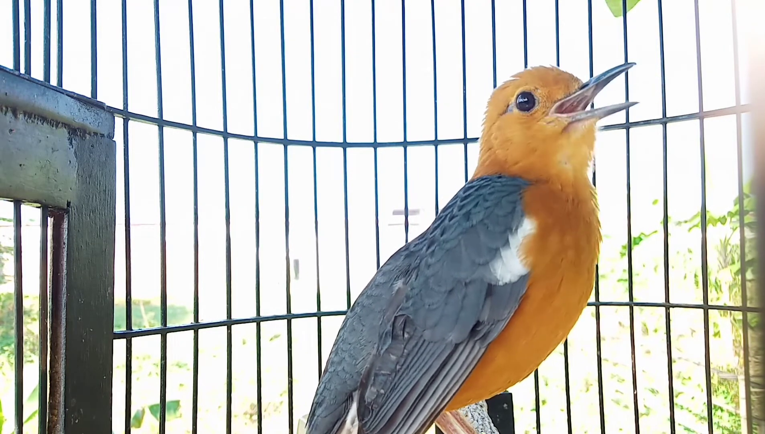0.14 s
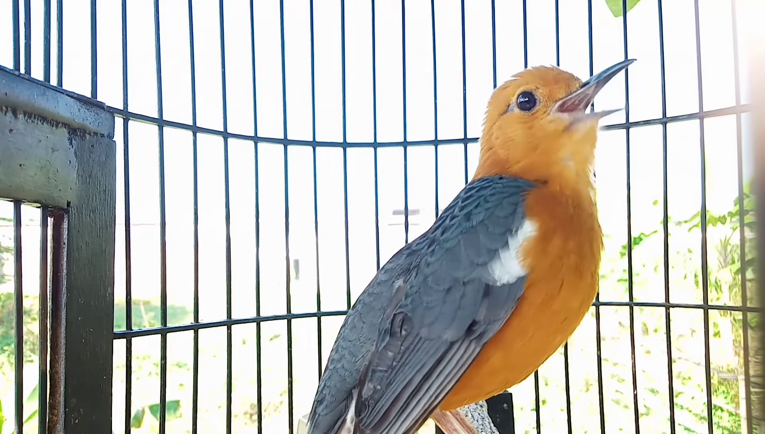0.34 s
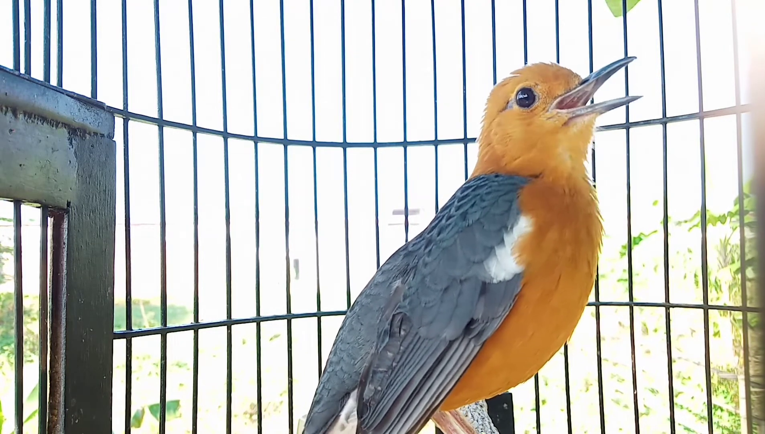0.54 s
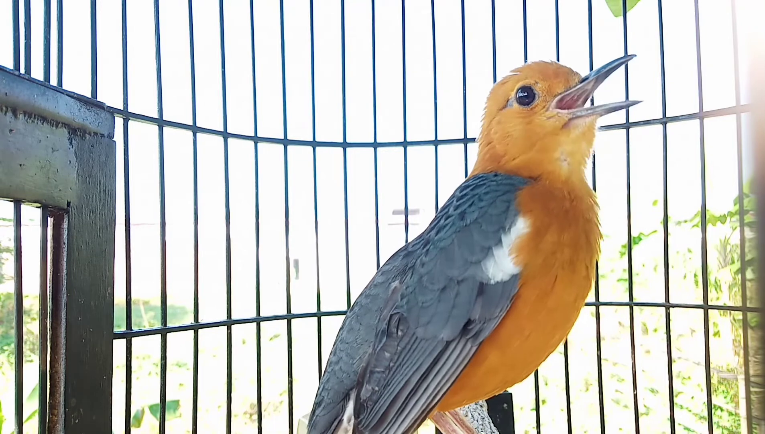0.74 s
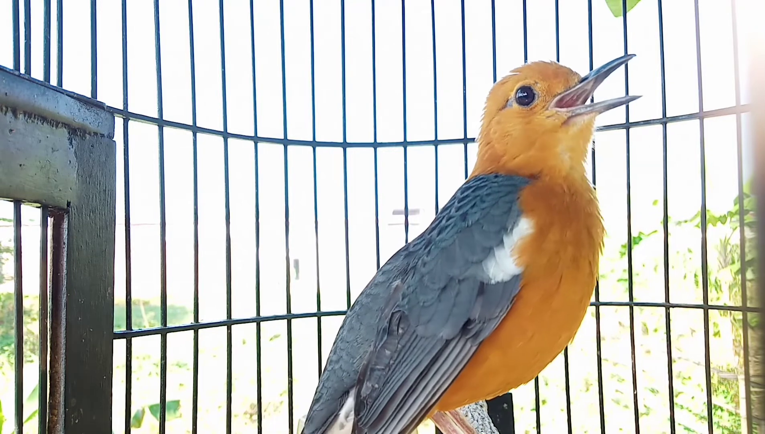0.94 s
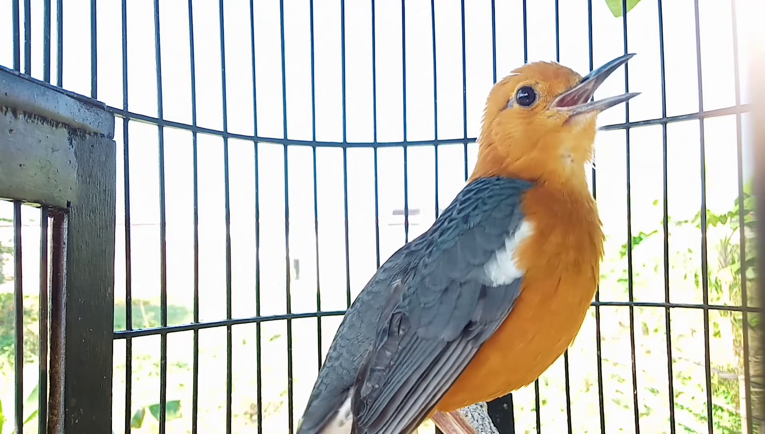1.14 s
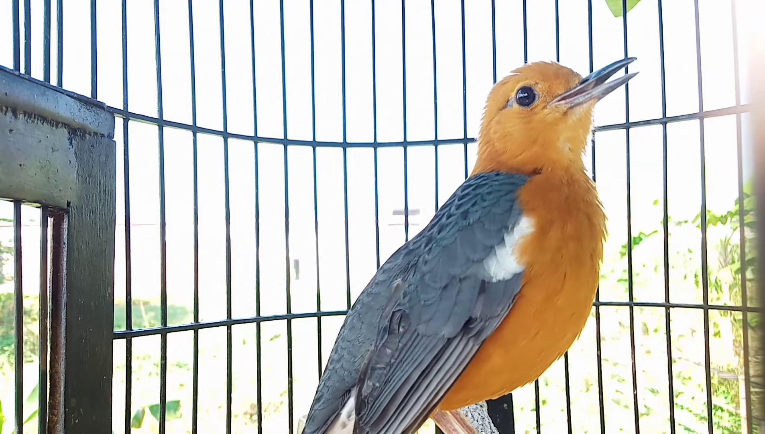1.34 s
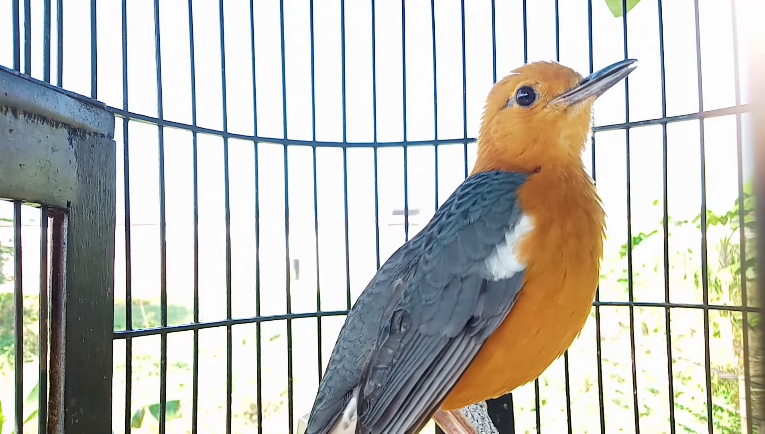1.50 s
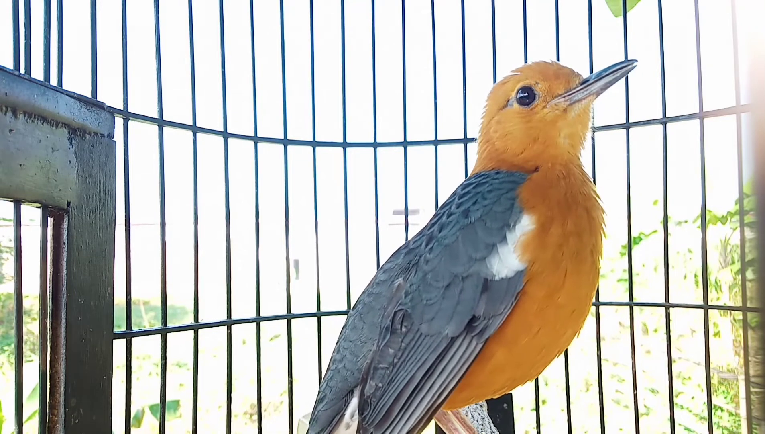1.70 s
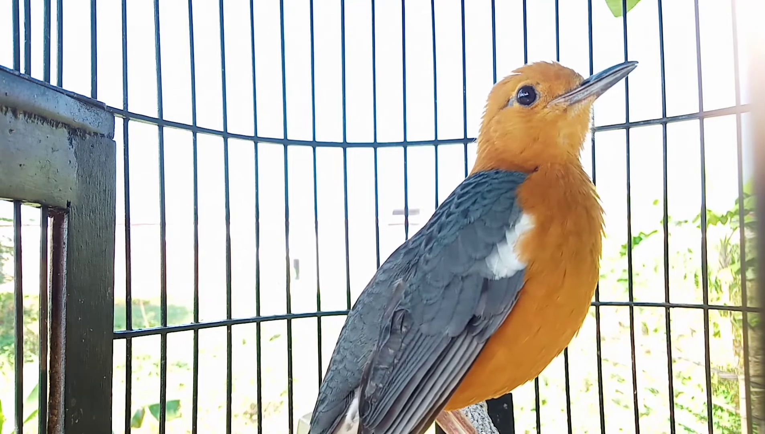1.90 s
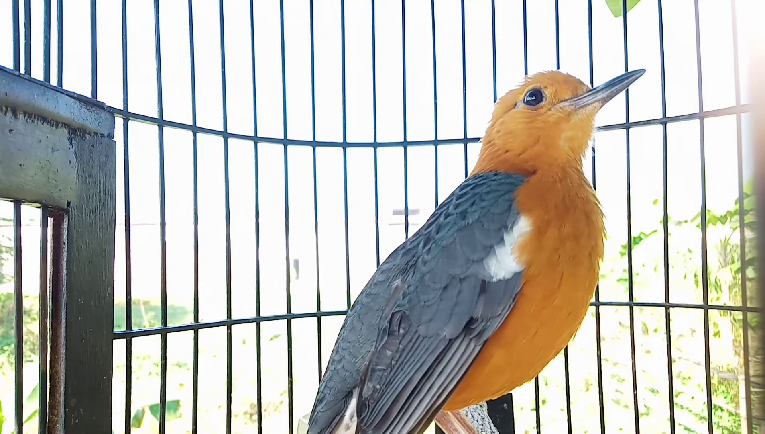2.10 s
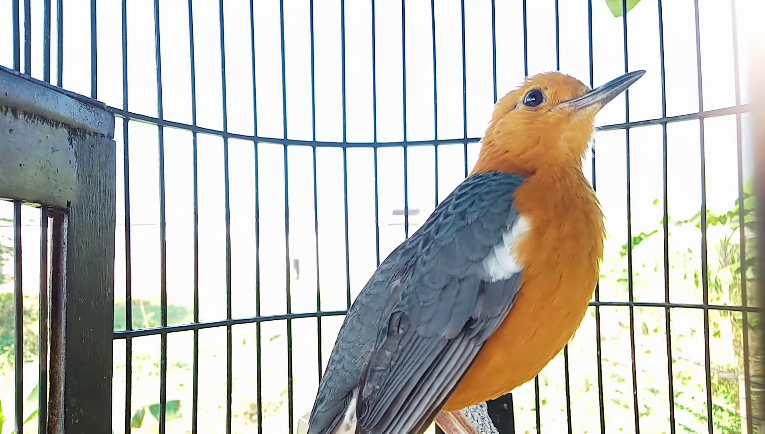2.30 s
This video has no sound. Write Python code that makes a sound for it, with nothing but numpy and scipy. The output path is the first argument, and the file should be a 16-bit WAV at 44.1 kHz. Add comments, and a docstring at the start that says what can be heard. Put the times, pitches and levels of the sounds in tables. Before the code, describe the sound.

A caged thrush whistles five loud slurred notes close by, slightly raspy and faintly echoing. The first rises at 0.1 seconds, the second dips and climbs, a softer low one follows at 0.6, and two falling notes end by 1.2. Faint dry insect-like ticks start behind the song and continue, slowing, until about 2.3 seconds. A soft low rumble lies under the quiet garden throughout.

```python
"""A quiet garden over a low outdoor rumble, the microphone close to a caged thrush. After one tiny
tap the bird whistles five loud slurred notes, rasping in places as its syrinx flutters and air rushes;
the cage bars scatter the treble and walls throw back faint echoes. Soft dry ticks, perhaps an insect,
start behind the song, carry on after it and slow down. Near the end come two more taps and a far hum."""
import sys
import numpy as np
from scipy import signal
from scipy.fft import rfft, irfft
from scipy.io import wavfile

SR = 44100
rng = np.random.default_rng(int(sys.argv[2]) if len(sys.argv) > 2 else 0)


def transcribe(u):
    """Save the signal u as a 16-bit wav file named by the first command-line argument.

    u: samples, shape (n,) or (channels, n), limited to [-1, 1]; the rate is SR.
    q: integer samples, one column per channel.
    """
    v = np.clip(np.atleast_2d(u).T, -1, 1)
    q = np.round(v * 32767).astype(np.int16)
    wavfile.write(sys.argv[1], SR, q)


N = 103635
TIME = np.arange(N) / SR


def thrush():
    """Close to the microphone: the syrinx whistles a gliding near-sine with weak, fuzzy overtones."""
    # The path of each note: t/s, f/Hz, level/dB, overtone gain/dB
    rise = [(0.112, 2040, -43, -13.5), (0.1215, 2346, -23, -13), (0.1454, 2395, -19, -20),
            (0.1514, 2490, -20, -18.5), (0.1679, 2690, -11.8, -20.5), (0.1813, 2675, -14.5, -15.5),
            (0.2113, 2850, -12.5, -13.5), (0.2143, 2894, -12.5, -19), (0.2442, 2985, -14, -7),
            (0.2487, 2941, -13.5, -12.5), (0.2786, 3076, -16.5, -7.5), (0.2846, 3570, -21.5, -29),
            (0.2886, 3220, -33.5, -21)]
    scoop = [(0.3465, 3705, -36, -12), (0.35, 3677, -13, -29), (0.3634, 3674, -5.5, -29),
             (0.3694, 3495, -11.5, -31.5), (0.3769, 3110, -11.5, -18.5), (0.3814, 3227, -11.5, -26.5),
             (0.4009, 2490, -16.5, -19), (0.4233, 2680, -11.5, -29.5), (0.4263, 2462, -17.5, -28),
             (0.4443, 2371, -18.5, -19.5), (0.4727, 2466, -17.5, -26.5), (0.4892, 2640, -12.0, -30.5),
             (0.4922, 2840, -15.5, -22.5), (0.5086, 2975, -12.5, -31), (0.5191, 2925, -10, -28.5),
             (0.5236, 3064, -15, -29), (0.5366, 2655, -44, -27.5)]
    low_note = [(.6165, 1490, -51.5, -2.5), (0.623, 1660, -44, -8.5), (0.6215, 1897, -29, -12.5),
                (0.631, 2058, -25.5, -21.5), (0.644, 2157, -20.5, -23), (0.656, 2089, -21, -28.5),
                (.675, 2054, -23.5, -24), (.689, 2228, -15, -32.5), (.712, 2073, -21, -26),
                (0.7145, 1966, -28.5, -16), (.718, 1910, -23, -19.5), (.729, 1680, -50, -13.5)]
    fall = [(.7717, 3646, -37.5, -34), (.776, 3597, -14.5, -26), (.786, 3498, -11, -40),
            (.793, 3390, -7.5, -23), (.805, 3015, -13.5, -29), (.809, 2930, -8.5, -40),
            (.818, 2880, -7, -30.5), (.823, 2792, -12.5, -22.5), (.843, 2727, -11.5, -23.5),
            (.849, 2594, -12, -23.5), (.86, 2553, -14, -25.5), (.9265, 2443, -21, -25),
            (.932, 2326, -30, -15.5), (.936, 2340, -50, -19)]
    last_fall = [(1.012, 3936, -25.5, -17), (1.017, 3590, -9, -39.5), (1.0234, 3566, -10, -28.5),
                 (1.0558, 3230, -8, -23.5), (1.0614, 3020, -11.5, -21.5), (1.0733, 3023, -10.0, -28),
                 (1.0921, 2752, -13, -19.5), (1.1048, 2770, -10, -28), (1.1147, 3010, -14, -29),
                 (1.1179, 2965, -12, -28.5), (1.1392, 2896, -13, -29.5), (1.1577, 2807, -15.5, -36),
                 (1.1709, 2637, -12, -30.5), (1.182, 2260, -45.5, -16)]
    # Overtone mix, a row per note: gain/dB of harmonics 2 to 7
    overtones = [(-1.5, -5, -11, -16, -20.5, -3), (-8.5, -6, -18.5, -13.5, -12, -2.5),
                 (-8.5, -6, -17.5, -9, -11.5, -4), (-2, -2, -11, -14, -16, -15.5),
                 (-3, -3.5, -11, -18, -21.5, -18.5)]
    # Colour that throat and beak give the overtones: f/Hz, gain/dB
    throat = [(2900, 29), (3700, 16.5), (4300, 0), (5700, -5.5), (6500, -8.5), (7400, 2), (8600, 3),
              (9800, -0.5), (11500, -6), (13000, -6), (14700, 1.5), (15700, -6)]
    notes = [rise, scoop, low_note, fall, last_fall]
    # Per note: harmonics 5 to 7 fade as the pitch climbs past middle_hz (negative: they grow)
    fades_db_per_khz, middle_hz = [-1.5, 20, 0, 28.5, 13], 2537
    steady_jitter, flutter_swing = 0.0017, 0.14  # shares of the pitch
    shimmer_db, waver_db, fuzz_rad = 1, 1.5, 0.1

    flutter, jitter, rush, fizz = rasp()
    bend = 1 + (steady_jitter + jitter) * band(0, 250) + flutter_swing * flutter
    tremble = (1 + flutter) * amp(shimmer_db * band(0, 110))
    air = breath(rush, fizz)
    wavers = [(waver_db * band(0, 70), fuzz_rad * band(0, 400.5)) for _ in overtones[0]]
    song = np.zeros(N)
    for note, mix, fade_db_per_khz in zip(notes, overtones, fades_db_per_khz):
        times, *columns = np.transpose(note)
        on = gate(times[0], times[-1], edge_s=0.00195)
        at = on > 0
        hz, level_db, bright_db = (glide(times, column)[at] for column in columns)
        phase = 2 * np.pi * np.cumsum(hz * bend[at]) / SR
        fade_db = fade_db_per_khz * np.maximum(hz - middle_hz, 0) / 1000
        tone = np.sin(phase)
        for k, (mix_db, (waver, fuzz)) in enumerate(zip(mix, wavers), 2):
            gain = amp(bright_db + mix_db + read(throat, k * hz) + waver[at] - (k >= 5) * fade_db)
            tone += (k * hz < SR / 2) * gain * np.sin(k * phase + fuzz[at])
        song[at] += on[at] * amp(level_db) * tremble[at] * (np.sqrt(2) * tone + air[at])
    return song


def glide(times, values, turn_s=0.0012):
    """A curve through the points with rounded corners: the syrinx cannot turn at once."""
    bell = np.exp(-.5 * (2 * np.arange(-200, 201) / SR / turn_s) ** 2)
    return signal.fftconvolve(np.interp(TIME, times, values), bell / bell.sum(), "same")


def rasp():
    """Flutter of the syrinx and the amounts of pitch jitter, rushing air and fizz over time."""
    # Rough stretches: start/s, end/s, flutter/Hz, depth/0-1, jitter/share of pitch,
    # rush/dB, fizz/dB (both relative to the whistle)
    stretches = [(0.236, .280, 520, 0.01, .005, -31.5, -30), (0.287, .292, 700, 0.56, .012, -26.5, -40),
                 (0.37, 0.385, 229.7, 0.19, .012, -25, -22), (0.386, 0.4, 230, 0.16, .007, -31.5, -32.5),
                 (0.49, .53, 480, 0, 0.0053, -38, -41.5), (.617, 0.642, 225, 0.37, .015, -24.5, -33.5),
                 (0.716, 0.738, 898, 0, 0.015, -22, -30), (0.794, .86, 400, 0.01, .004, -36.5, -43.5),
                 (0.88, 0.929, 400, 0.03, .003, -37.5, -35), (1.064, 1.113, 330, 0.04, .006, -37.5, -38.5),
                 (1.114, 1.158, 290, 0.06, .011, -31, -32.5), (1.153, 1.182, 330, 0.11, .012, -30, -52)]
    flutter, jitter, rush, fizz = np.zeros((4, N))
    for start, end, hz, depth, share, rush_db, fizz_db in stretches:
        on = gate(start, end, edge_s=.004)
        flutter_hz = hz * (1 + 0.3 * band(0, 80))
        turns = np.cumsum((TIME > start) * flutter_hz) / SR
        flutter += on * depth * np.sin(2 * np.pi * turns)
        jitter += on * share
        rush += on * amp(rush_db)
        fizz += on * amp(fizz_db)
    return flutter, jitter, rush, fizz


def breath(rush, fizz):
    """Air rushes and fizzes faintly all through the notes, and harder where they rasp."""
    # Spectra of the rushing air and of its treble fizz: f/Hz, level/dB
    rush_colour = [(500, -26), (1300, -22.5), (1800, -12.5), (2500, -4), (3300, 12), (4400, -5.5),
                   (6000, -15), (9000, -24.5), (15500, -36)]
    fizz_colour = [(3000, -29), (4800, -14.5), (6000, -0.5), (8300, 5), (10800, -14.5), (13500, -1.5),
                   (15500, 4.5)]
    steady_rush_db, steady_fizz_db, flicker_db = -39, -46, 1.5
    rushing = coloured(rush_colour) * (amp(steady_rush_db) + rush)
    fizzing = coloured(fizz_colour) * (amp(steady_fizz_db) + fizz)
    return rushing + fizzing * amp(flicker_db * band(0, 90))


def cage(song, scatter_db=-11.5, decay_s=0.0024):
    """Dense, very short reflections off the bars make the overtones flicker as they glide."""
    # The treble that the bars scatter: f/Hz, level/dB
    bars_colour = [(3500, -36), (5500, 1)]
    decay = np.exp(-TIME / decay_s)
    scatter = unit(coloured(bars_colour) * decay * (1 - decay)) / np.sqrt(N)
    return song + amp(scatter_db) * signal.fftconvolve(song, scatter)[:N]


def echoes(song):
    """Quick reflections from the cage and nearby walls, one faint wall echo and a thin garden tail."""
    # Spectrum of the garden's tail: f/Hz, level/dB
    far_colour = [(2000, -11.5), (2600, -8.5), (2950, 0), (3300, -5), (3700, -4.5), (5000, -14),
                  (9000, -15.5)]
    near_db, near_t60_s = -29.5, .2
    far_db, far_t60_s, far_build_s = -50.5, 0.75, 0.12
    wall_db, wall_delay_s = -38.5, .043
    near = coloured([(3800, 0.017), (7000, -4)]) * amp(-60 * TIME / near_t60_s) * (TIME > .002)
    far = coloured(far_colour) * amp(-60 * TIME / far_t60_s) * np.minimum(TIME / far_build_s, 1)
    response = (amp(near_db) * unit(near) + amp(far_db) * unit(far)) / np.sqrt(N)
    response[round(wall_delay_s * SR)] += amp(wall_db)
    return signal.fftconvolve(song, response)[:N]


def ticks():
    """Well behind the bird, perhaps an insect: short grainy scrapes, each with a snap and a faint tail."""
    # The scrapes: t/s, level/dB, length/s
    scrapes = [(0.301, -57, .008), (0.323, -59, 0.012), (0.558, -63, 0.012), (0.576, -56, .007),
               (0.75, -60, 0.0047), (0.945, -62.5, 0.01), (0.993, -55.5, 0.0084), (1.2013, -62, 0.0095),
               (1.254, -57.5, 0.012), (1.3116, -58, 0.0061), (1.3624, -59.5, 0.0093), (1.4167, -56, 0.0078),
               (1.466, -58, .008), (1.5211, -57.5, 0.0088), (1.5725, -55.5, .01), (1.6278, -57, .009),
               (1.6812, -56, 0.011), (1.7375, -55.5, 0.0084), (1.7945, -56.5, 0.0077), (1.8536, -57, .009),
               (1.9103, -57, 0.0058), (1.97, -53.5, .008), (2.029, -56, .007), (2.0934, -60, .01),
               (2.16, -62.5, .01), (2.247, -58, 0.0053), (2.268, -60.5, .007)]
    # Their spectrum: f/Hz, level/dB
    scrape_colour = [(300, -22.5), (1200, -12.5), (2200, -6), (2900, -16), (3600, -8.5), (5000, -18),
                     (6200, -8), (7000, -1), (8000, 4), (8700, -7.5), (10800, -10), (12600, -7), (13700, 4),
                     (14500, -7), (15600, 0)]
    rise_s, fall_s, tail_s, snap_s = .0005, .002, 0.014, 0.00043
    tail_db, snap_db, grain_db = -21, -11.5, 2.5
    envelope = np.zeros(N)
    for start, db, length in scrapes:
        age = TIME - start
        after = np.maximum(age - length, 0)
        fade = np.exp(-after / fall_s) + amp(tail_db) * np.exp(-after / tail_s)
        snap = amp(snap_db) * np.exp(-abs(age) / snap_s)
        envelope += amp(db) * np.clip(age / rise_s, 0, 1) * (fade + snap)
    return envelope * unit(coloured(scrape_colour) * amp(grain_db * band(0, 500)))


def taps():
    """Tiny dull clicks: bursts of noise that die at once."""
    # The clicks: t/s, level/dB, centre/Hz, width/Hz, decay/s
    clicks = [(0.059, -50.5, 2004, 1210, 0.0026), (2.071, -56.5, 1258, 350, .0025),
              (2.2483, -54, 2307, 1296, 0.0018)]
    return sum(amp(db) * (TIME > start) * np.exp(-abs(TIME - start) / decay) * band(hz, width)
               for start, db, hz, width, decay in clicks)


def garden():
    """The ambience of the place: low rumble, thin hiss, a few soft rustles and a faint far-off hum."""
    # Soft low rustles: start/s, end/s, level/dB, centre/Hz, width/Hz
    stirs = [(0, 0.052, -68.5, 1050, 260), (.235, 0.258, -57.5, 650, 282), (.29, 0.342, -60, 780, 219),
             (.35, 0.516, -63.5, 680, 330), (.36, 0.402, -54.5, 150, 120), (.79, .85, -62.5, 130, 98.5),
             (1.05, 1.16, -64, 200, 199), (1.64, 1.713, -74, 1200, 496.5), (1.98, 2.35, -78, 800, 606.4)]
    # Spectra of the outdoor rumble and of the hiss: f/Hz, level/dB
    rumble_colour = [(20, -27.5), (40, -14), (70, -1.5), (105, 0.5), (250, -2), (420, -13), (750, -15.5),
                     (1600, -16), (3000, -19.5), (5200, -27), (7500, -18.5), (9000, -24.5), (14000, -24.5),
                     (16000, -27)]
    hiss_colour = [(3000, -23), (5500, -16.5), (7500, 11), (9000, -17), (12000, -19), (16000, -14.5)]
    rumble_db, sway_db, hiss_db = -65.5, -0.37, -78.5
    hum_hz, hum_db = 536, -75.5
    rustles = sum(amp(db) * gate(start, end, edge_s=0.036) * band(hz, width)
                  for start, end, db, hz, width in stirs)
    hum = amp(hum_db) * gate(1.97, 2.295, edge_s=0.045) * np.sqrt(2) * np.sin(2 * np.pi * hum_hz * TIME)
    rumble = amp(rumble_db + sway_db * band(0, 10)) * coloured(rumble_colour)
    return rumble + amp(hiss_db) * coloured(hiss_colour) + rustles + hum


def amp(db):
    """Decibels to gain."""
    return 10 ** (np.asarray(db) / 20)


def unit(x):
    """Scales to rms 1."""
    return x / np.sqrt(np.mean(x ** 2) + 1e-20)


def read(points, hz):
    """Reads a spectrum on a log-frequency axis."""
    f, value = np.transpose(points)
    return np.interp(np.log(hz + 1), np.log(f + 1), value)


def noise(shape):
    """Noise of rms 1 whose gain over frequency follows shape(Hz)."""
    white = rfft(rng.standard_normal(N))
    return unit(irfft(white * shape(np.fft.rfftfreq(N, 1 / SR)), N))


def coloured(points):
    """Noise of rms 1 shaped by points of f/Hz, level/dB."""
    return noise(lambda f: amp(read(points, f)))


def band(centre_hz, width_hz):
    """Noise in a bell-shaped band; centred on zero it is a random waver."""
    return noise(lambda f: np.exp(-.5 * ((f - centre_hz) / width_hz) ** 2))


def gate(start, end, edge_s):
    """One between start and end, with sloping edges."""
    return np.clip(np.minimum(TIME - start, end - TIME) / edge_s + .5, 0, 1)


def scene():
    """One microphone: the bird close in front, everything else far behind."""
    song = cage(thrush())
    return (song + echoes(song) + ticks() + taps() + garden())[None]


def record(dry):
    """The recorder's band limit cuts the highest treble."""
    cutoff_hz = 15850
    lowpass = signal.firwin(511, cutoff_hz, window=("kaiser", 9), fs=SR)
    return signal.oaconvolve(dry, lowpass[None], "same")


dry = scene()
out = record(dry)
transcribe(out)
```